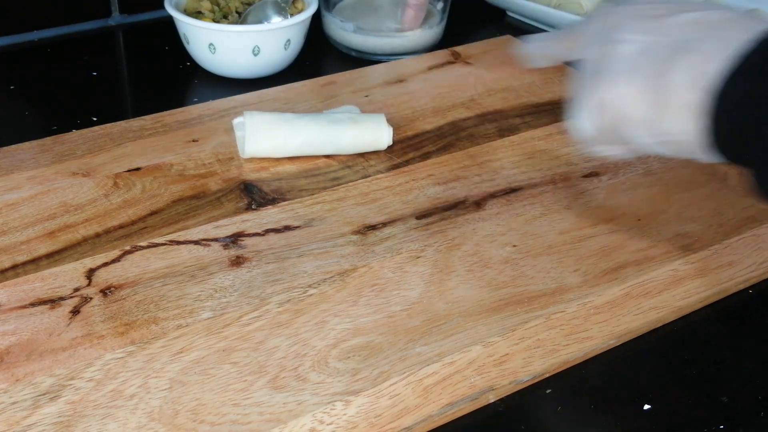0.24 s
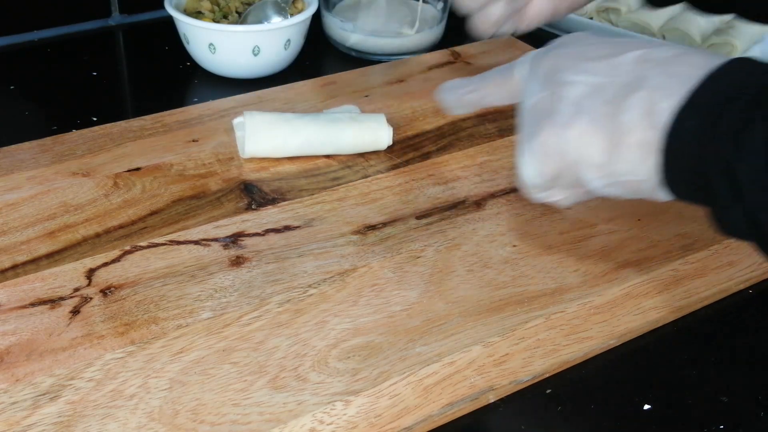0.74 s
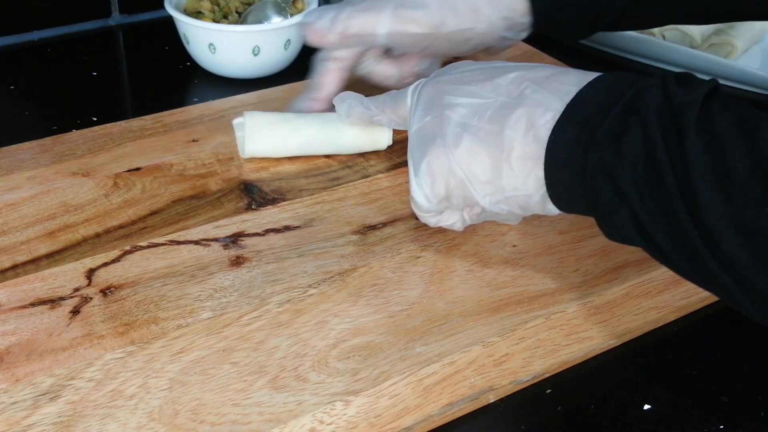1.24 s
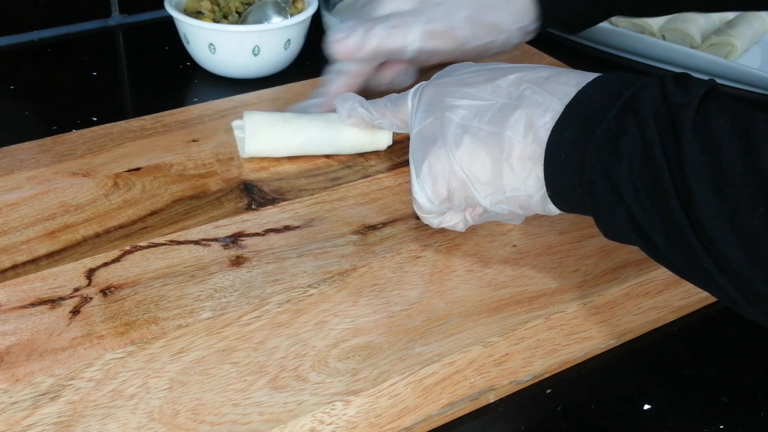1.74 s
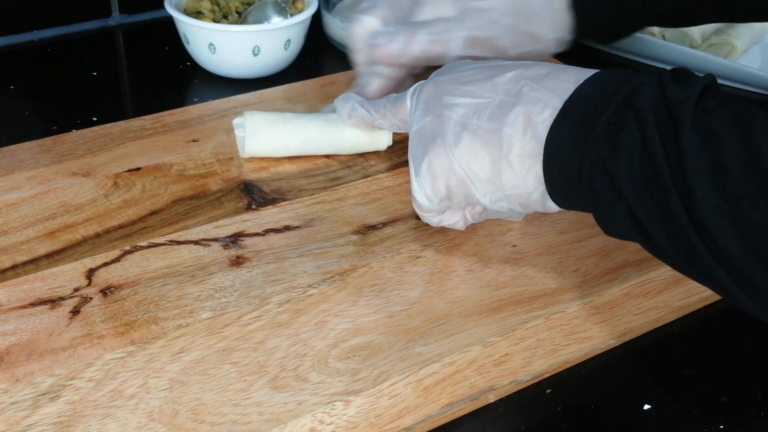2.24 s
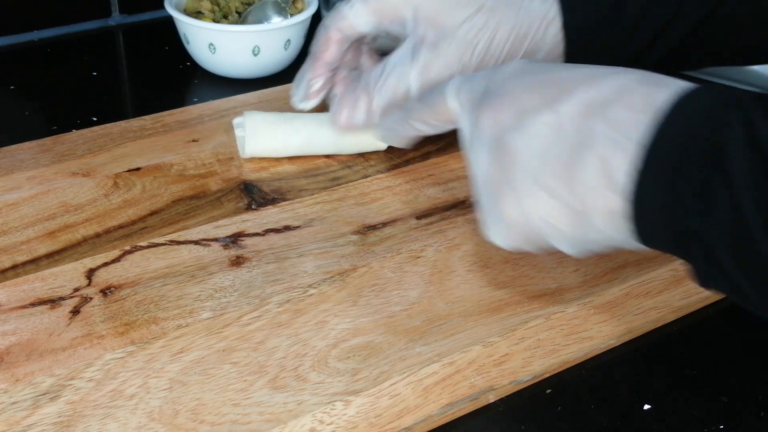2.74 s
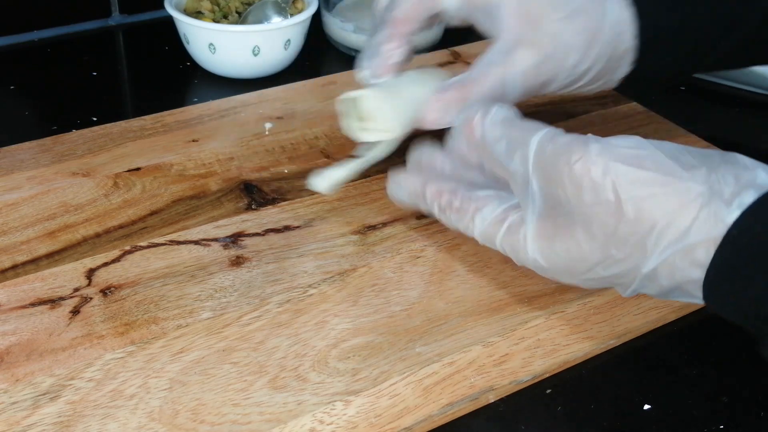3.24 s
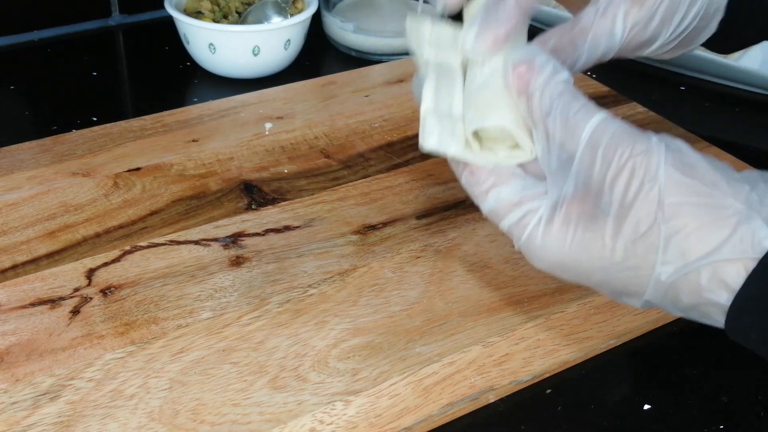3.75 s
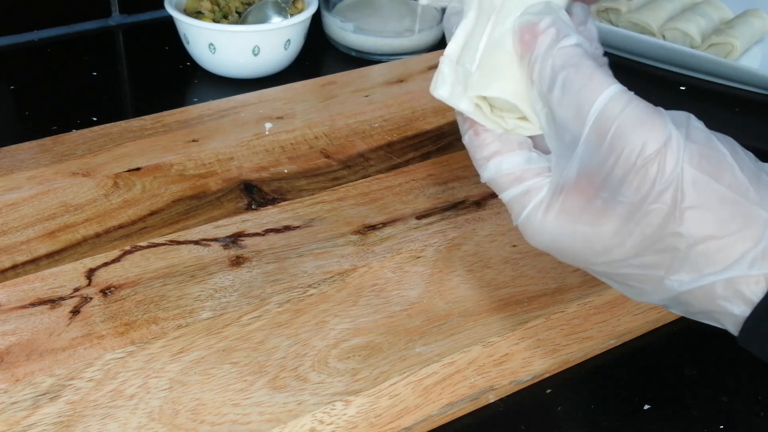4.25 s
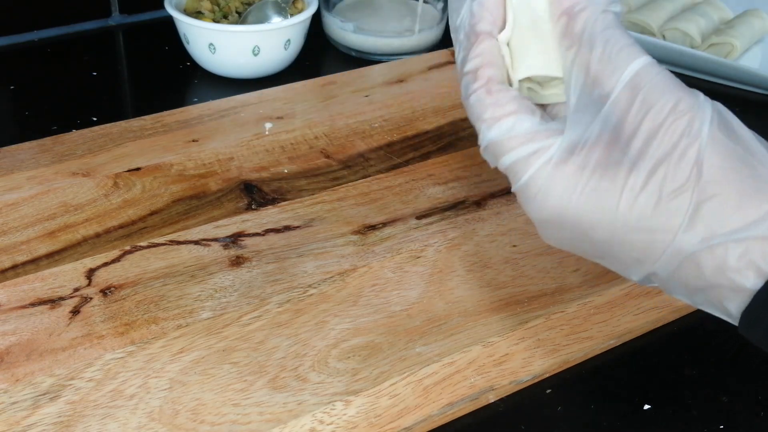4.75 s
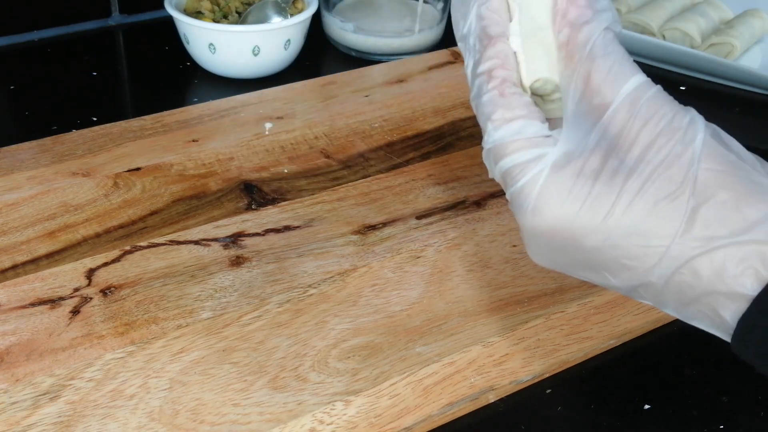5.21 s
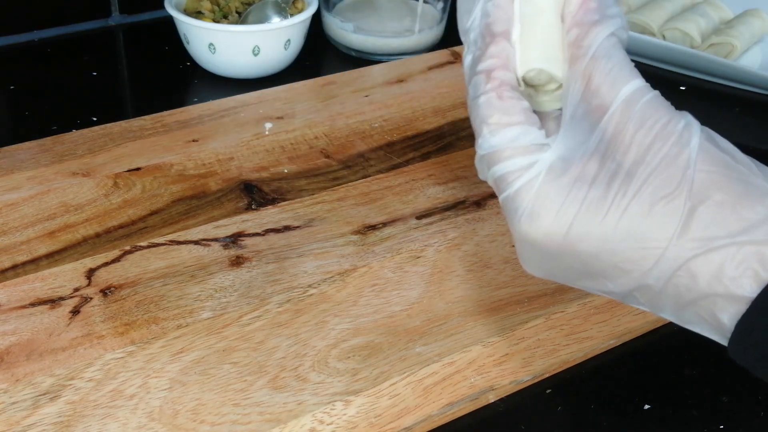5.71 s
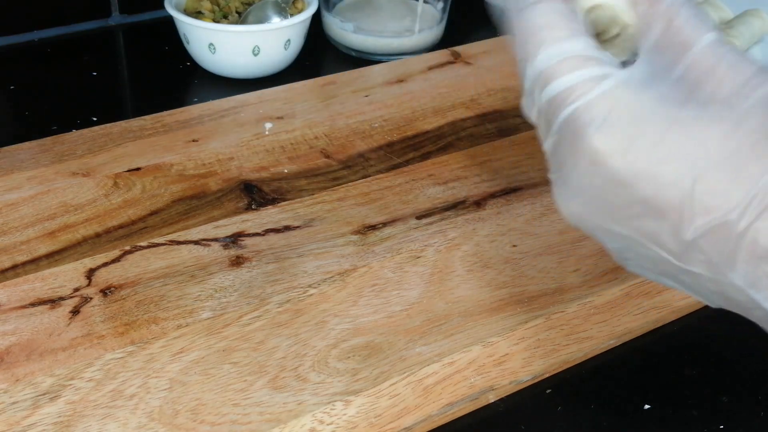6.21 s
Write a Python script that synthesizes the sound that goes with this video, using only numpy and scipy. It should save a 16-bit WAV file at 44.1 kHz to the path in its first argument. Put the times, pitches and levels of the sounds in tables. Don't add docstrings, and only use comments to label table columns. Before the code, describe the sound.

Close to the microphone in a small quiet kitchen, thin plastic gloves barely tick at first, then crackle in short dabs. Fuller, duller rustling follows as pastry is lifted and turned, then tight crinkling while it is wrapped. One firm knock on a wooden board lands around four seconds. A refrigerator hums low, a fan drones, and a distant bird whistles faintly.

```python
import sys
import numpy as np
from scipy import signal
from scipy.fft import rfft, irfft, next_fast_len
from scipy.io import wavfile
from scipy.ndimage import uniform_filter1d

SR = 44100
rng = np.random.default_rng(int(sys.argv[2]) if len(sys.argv) > 2 else 0)


def file_out(sig):
    cols = np.atleast_2d(sig).T
    lim = np.clip(cols, -1, 1)
    pcm = np.round(lim * 32767).astype(np.int16)
    wavfile.write(sys.argv[1], SR, pcm)


def natural_amplitude(level_db):
    exponent = np.asarray(level_db, float) / 20
    return 10 ** exponent


N = 285541
PADDED = next_fast_len(N)

# time of the peak in seconds, rise in seconds,
# fall in seconds, effort in dB, slack film relative to taut film in dB.
DABS = [(1.40, 0.072, 0.19, -76.5, 0), (1.545, 0.035, 0.065, -76, 1.5), (1.60, 0.12, 0.095, -65, -1),
        (1.70, 0.022, .035, -62, -7), (1.78, .1, 0.18, -75, -7), (1.969, 0.043, 0.069, -56, 1),
        (2.02, 0.05, 0.046, -68, 7), (2.199, 0.037, .04, -71.5, 2.5), (2.235, 0.021, .07, -70, 5.5),
        (2.34, 0.091, .1, -78, 2), (2.44, 0.1, 0.057, -73.5, -7.5), (2.515, 0.042, 0.087, -58.5, -1.5),
        (2.565, 0.071, .05, -61, -4.5), (2.67, 0.045, .06, -70, -9.5), (2.619, 0.023, 0.045, -59.5, -5),
        (2.725, .07, 0.073, -68.5, 4)]
# time of the peak in seconds, rise in seconds,
# fall in seconds, effort in dB, slack film relative to taut film in dB.
LIFTS = [(2.9, 0.027, 0.28, -65.5, -5.5), (3.03, 0.18, 0.16, -62.5, -11), (3.13, 0.11, 0.13, -63, -9.5),
         (3.3, .2, 0.46, -68, -9.5), (3.406, 0.0058, 0.063, -57.5, -12), (3.48, 0.08, 0.091, -58.5, -7),
         (3.54, 0.061, 0.11, -59.5, -6.5), (3.62, 0.052, 0.049, -68.5, -4.5), (3.775, 0.14, 0.08, -64, -8),
         (3.849, 0.085, 0.091, -65.5, -5), (3.97, 0.17, 0.38, -67.5, -12), (5.45, 0.045, 0.015, -66.5, -8),
         (4.57, 0.05, .05, -74, 2), (6.2, .06, 0.065, -75, 0)]
# time of the peak in seconds, rise in seconds,
# fall in seconds, effort in dB, slack film relative to taut film in dB.
WRAPS = [(4.061, .008, .07, -58, -10), (4.164, 0.084, 0.039, -61.5, -8), (4.215, 0.043, 0.065, -67.5, 0),
         (4.271, 0.05, 0.06, -63, -13), (4.35, .025, 0.035, -63, 0.5), (4.392, 0.049, 0.024, -51, -6.5),
         (4.5, 0.26, 0.24, -68, -2), (4.61, .025, 0.07, -60, -11.5), (4.7, .03, 0.077, -63.5, -10.5),
         (4.729, .006, .12, -62, -11.5), (4.86, 0.035, 0.11, -70.5, -9.5), (5.06, 0.18, 0.16, -74, -1.5),
         (5.158, 0.046, 0.034, -64, -4), (5.24, 0.21, .12, -69, -6), (5.311, 0.046, 0.026, -63.5, -2),
         (5.398, .09, 0.077, -57, -5.5), (5.553, 0.053, .05, -66.5, -4.5), (5.715, .12, .09, -69.5, -5),
         (5.895, 0.12, .1, -70, -6.5), (5.998, 0.071, 0.071, -70, -5.5), (6.145, 0.054, 0.12, -64, -6.5),
         (6.34, 0.083, 0.063, -57.5, -12.5), (6.4, 0.056, .05, -60, -11.5), (6.46, 0.029, .1, -59.5, -20)]
# time in seconds, peak in dB, ring pitch in Hz,
# slack part relative to the peak in dB.
CREASES = [(.168, -63, 4500, -4), (.358, -55, 6900, -29), (1.5363, -54, 5480, -7), (1.6876, -50, 4650, -20),
           (1.6907, -47.5, 4680, -11), (1.9368, -46, 5440, -12), (1.9477, -43, 6410, -1),
           (1.9688, -40, 4950, -16), (2.2237, -47.5, 5500, 8), (2.4908, -44, 5650, 3),
           (2.613, -45, 5240, -21), (3.0253, -42, 6670, -16), (3.2798, -46, 6700, -17.5),
           (3.404, -43, 5870, -31), (3.4085, -41, 6180, -25), (3.7737, -41, 6820, -19),
           (4.061, -50, 6940, -9), (4.1179, -37, 6300, -10), (4.339, -45, 6050, 3), (4.3443, -55, 5190, 5),
           (4.5997, -44, 5170, -1), (4.682, -45.5, 6830, -21), (4.7272, -40, 6900, -25),
           (5.3127, -51, 5200, -8), (5.3736, -46, 5970, 1), (5.392, -40.5, 5060, 2),
           (5.4632, -41.5, 6740, -17), (6.1428, -54, 6900, -7), (6.2895, -48, 5650, -1),
           (6.4538, -46, 6230, -28)]
# time in seconds, peak in dB, time to die by 60 dB in seconds.
KNOCKS = [
    (1.995, -58, 0.16),
    (4.117, -44.5, 0.2),
]
# pitch in Hz, width in Hz, level in dB.
HOLLOWS = [(2560, 90, -4.5), (3000, 130, -10.5), (5190, 50, 1), (6050, 22, -6), (7190, 200, -5)]
# time in seconds, pitch in Hz, level in dB.
BIRD_PHRASES = [
    [(.42, 4200, -104.5), (.455, 4140, -74), (.49, 4150, -93), (.54, 4150, -86), (.59, 4150, -93)],
    [(.56, 4640, -93), (.62, 4700, -94), (.68, 4750, -94), (.72, 4830, -97)],
    [(.83, 4360, -99), (.855, 4350, -91), (.88, 4400, -94)],
    [(.93, 4440, -90), (1.0, 4330, -86), (1.08, 4530, -92), (1.13, 4530, -87), (1.2, 4620, -84),
     (1.24, 4760, -96)],
    [(4.84, 3940, -99), (4.9, 3860, -81), (4.96, 3880, -81), (5.04, 4000, -99)],
]
# time of the peak in seconds, half length in seconds,
# level in dB.
BOOMS = [(.17, 0.097, -60.5), (.42, 0.25, -56), (.82, 0.13, -55), (1.08, .1, -57), (1.3, .08, -58),
         (1.82, .3, -55.5), (2.1, 0.098, -57), (2.68, 0.36, -57), (3.1, .15, -55.5), (3.32, .25, -59.5),
         (3.76, .14, -55), (4.12, 0.35, -54), (4.33, .12, -52), (4.67, 0.2, -52.5), (5.08, .25, -54.5),
         (5.47, .1, -55), (5.7, .14, -60.5), (6.13, 0.17, -53), (6.36, 0.19, -56.5)]
# time in seconds, level in dB.
BLADE_LEVEL = [(0.0, -62), (0.07, -66.5), (2.27, -71.5), (2.43, -65), (2.49, -81), (2.81, -63), (2.99, -85),
               (3.04, -70), (4.23, -66), (4.27, -74), (4.9, -60.5), (4.94, -69), (5.97, -69), (6.47, -79)]
# time in seconds, level in dB.
DRAUGHT = [(0, -74), (1.0, -69), (1.9, -75.5), (3.2, -75.5), (3.7, -67.5), (4.2, -73.5), (4.5, -79),
           (4.9, -74.5), (5.3, -80), (5.85, -76), (6.47, -82)]
# pitch in Hz, level in dB.
HUM = [(99.887, -44), (199.77, -79.5), (299.66, -78), (399.55, -84)]
# pitch in Hz, width in Hz, level in dB.
DRONE = [(488, 5, -79), (300, 12, -75), (217, 8, -75), (13, 6, -72), (383, 2, -82), (683, 3, -86)]
# frequency in Hz, level in dB per Hz.
AIR = [(5, -88.5), (30, -85), (60, -79.5), (85, -81.5), (150, -85), (180, -94), (260, -87), (370, -94.5),
       (540, -91.5), (620, -100), (1000, -103), (1500, -108), (2200, -112), (9000, -114)]
# frequency in Hz, gain in dB.
MIC = [(2000, 0), (2700, -0.5), (3450, 0.5), (3850, -7), (4300, -4), (4800, -0.5), (6300, -1.5), (6800, 3),
       (7200, 0.5), (7450, -8), (7700, -17.5), (7860, -32), (7950, -74)]


def gloves():
    t, coarse = np.arange(N) / SR, np.arange(0, N, 64) / SR
    moves = DABS + LIFTS + WRAPS
    power = np.array([effort(coarse, *move[:-1]) for move in moves])
    effort_db, slack_db = np.transpose(moves)[-2:]

    stretch_db = -7 + 0.3 * slack_db + 0.34 * (effort_db - effort_db.mean())
    dough_db = slack_db + np.repeat((-8, -3.5, -26), [len(DABS), len(LIFTS), len(WRAPS)])

    def strength(share):
        return np.interp(t, coarse, np.sqrt(share ** 2 @ power))

    slackness = np.interp(t, coarse, slack_db @ power / power.sum(0))
    taut_hz = 5460 - 60.5 * slackness
    layers = strength(np.ones(len(power))) * film(4750, 7600, cycles=13, per_s=3600, spread_db=1.7,
                                                  centre_hz=taut_hz)
    layers += strength(natural_amplitude(slack_db)) * film(1750, 3680, cycles=13, per_s=2600, spread_db=2.7,
                                             centre_hz=2930, octaves=0.18)
    layers += strength(natural_amplitude(stretch_db)) * film(3530, 4500, cycles=12, per_s=1800, spread_db=3)
    layers += strength(natural_amplitude(dough_db)) * film(630, 1900, cycles=1, per_s=1500, spread_db=2.2)

    clump_db, clump_s = 0.5, 0.0097
    clumps = evened(uniform_filter1d(rng.standard_normal(N), round(clump_s * SR)))
    return natural_amplitude(clump_db * clumps) * layers


def effort(t, s, rise, fall, db):
    late = np.where(t < s, (s - t) / max(rise, .003), (t - s) / max(fall, .003))
    return natural_amplitude(db - 16.5 * late ** 1.34) ** 2 + 1e-14


def film(low_hz, high_hz, cycles, per_s, spread_db, centre_hz=None, octaves=0.11, count=16):
    chance, size, sign = rng.random(N), rng.exponential(1, N), rng.choice([-1., 1.], N)
    which = rng.integers(0, count, N)
    pitches = np.geomspace(low_hz, high_hz, count) * rng.uniform(1.0, 1.02, count)

    shift_db, shift_s = 1.5, 0.056
    drift = rng.standard_normal((N // 256 + 1, count))
    load = evened(uniform_filter1d(drift, round(shift_s * SR / 256), axis=0))
    snap_db = spread_db * np.minimum(size, 4) + shift_db * load[np.arange(N) // 256, which]
    snaps = sign * natural_amplitude(snap_db) * (chance < per_s / SR)

    if centre_hz is not None:
        distance = np.log2(pitches[which] / centre_hz) / octaves
        snaps = snaps * (0.8 + np.exp(-.5 * distance ** 2))
    out = np.zeros(N)
    for k, hz in enumerate(pitches):
        out += signal.oaconvolve(snaps * (which == k), evened(ring(hz, cycles)))[:N]
    return evened(out)


def ring(hz, cycles, size=400):
    turns = np.arange(size) / SR * hz
    return np.sin(2 * np.pi * turns) * np.exp(-3 * turns / cycles) * (1 - np.exp(-2 * turns))


def creases():
    out, t = np.zeros(N), np.arange(6000) / SR
    shape = (len(CREASES), len(t))
    spray = rng.standard_normal(shape) * (rng.random(shape) < .08)
    spray_t60 = 0.083
    for (s, db, hz, slack_db), grains in zip(CREASES, spray):
        drive = 0.24 * grains * natural_amplitude(-60 * t / spray_t60)
        drive[0] = 1
        body = ring(hz, 18.0) + 0.94 * ring(5100, 2.8) + natural_amplitude(slack_db) * ring(2500, 6.7)
        add(out, s, natural_amplitude(db - 8) * signal.oaconvolve(drive, body))
    return out


def knocks():
    out, t = np.zeros(N), np.arange(8000) / SR
    board = signal.butter(2, [280, 1050], "band", fs=SR)
    for s, db, t60 in KNOCKS:
        noise = rng.standard_normal(len(t))
        puff = evened(signal.lfilter(*board, noise)) * natural_amplitude(db - 11.5 - 60 * t / t60)
        crack = noise * natural_amplitude(db - 2.5 - 60 * t / 0.096)
        push = np.sin(2 * np.pi * 170 * t) * natural_amplitude(db - 4.5 - 60 * t / 0.037)
        add(out, s, puff + crack + push)
    return out


def hollows(x):
    def gain_at(f):
        return 1 + sum(natural_amplitude(db) / (1 + 2j * (f - hz) / width) for hz, width, db in HOLLOWS)
    return shaped(x, gain_at)


def kitchen(x):
    t = np.arange(SR // 3) / SR
    room_t60 = 0.054
    sparse = (rng.random(len(t)) < .06) * (t > .002)
    taps = rng.choice([-1., 1.], len(t)) * sparse * natural_amplitude(-60 * t / room_t60)
    return signal.oaconvolve(x, taps / np.linalg.norm(taps))[:N]


def fan():
    t, coarse = np.arange(N) / SR, np.arange(0, N, 64) / SR
    boom_power = sum(effort(coarse, s, half, half, db) for s, half, db in BOOMS)
    boom = np.interp(t, coarse, np.sqrt(boom_power))
    shaft = wavering_tone(44, 1.5)
    blade = wavering_tone(244, 1.5)
    shake, flap, gust = (hump(0, width, rng.standard_normal(N)) for width in (20., 10., 4.))
    blade_db = np.interp(t, *np.transpose(BLADE_LEVEL)) + 1.9 * flap
    rush_db = np.interp(t, *np.transpose(DRAUGHT)) + 1.5 * gust
    rush = natural_amplitude(rush_db) * hump(560, 560, rng.standard_normal(N))
    return boom * natural_amplitude(2 * shake) * shaft + natural_amplitude(blade_db) * blade + rush


def wavering_tone(hz, width):
    pitch = hz + width * hump(0, 5., rng.standard_normal(N))
    return np.sqrt(2) * np.sin(2 * np.pi * np.cumsum(pitch) / SR)


def appliances():
    t = np.arange(N) / SR
    hum = sum(natural_amplitude(db) * np.sqrt(2) * np.sin(2 * np.pi * (f * t + rng.random())) for f, db in HUM)
    noise = rng.standard_normal(N)
    return hum + sum(natural_amplitude(db) * hump(f, width, noise) for f, width, db in DRONE)


def bird():
    out = np.zeros(N)
    for rows in BIRD_PHRASES:
        s, hz, db = np.transpose(rows)
        t = np.arange(s[0], s[-1], 1 / SR)
        flutter, waver = (evened(uniform_filter1d(rng.standard_normal(len(t)), 300)) for _ in range(2))
        pitch = np.interp(t, s, hz) * (1 + .008 * waver)
        pips = .85 + .5 * flutter
        level = natural_amplitude(np.interp(t, s, db) + 9.0)
        add(out, s[0], pips * level * np.sin(2 * np.pi * np.cumsum(pitch) / SR))
    return out


def air():
    frames = N // 512 + 5
    a, b, patches = rng.standard_normal((frames, 1025, 3)).T
    patches = uniform_filter1d(patches, 20, axis=0)
    patches = evened(uniform_filter1d(patches, 8, axis=1))
    white = signal.istft((a + 1j * b) * natural_amplitude(1.3 * patches), nperseg=2048, noverlap=1536)[1][:N]
    return shaped(evened(white), lambda f: natural_amplitude(read(AIR, f)) * np.sqrt(SR / 2))


def evened(x):
    return x / np.sqrt(np.mean(x ** 2) + 1e-20)


def read(points, hz):
    f, value = np.transpose(points)
    return np.interp(np.log(hz + 1), np.log(f + 1), value)


def add(mix, s, sound):
    part = mix[round(s * SR):][:len(sound)]
    part += sound[:len(part)]


def shaped(x, gain_at):
    return irfft(rfft(x, PADDED) * gain_at(np.fft.rfftfreq(PADDED, 1 / SR)), PADDED)[..., :N]


def hump(hz, width, x):
    return evened(shaped(x, lambda f: 1 / (1 + (2 * (f - hz) / width) ** 2)))


def scene():
    near = hollows(gloves() + creases() + knocks())
    echo = natural_amplitude(-11.5) * kitchen(near)
    return (near + echo + fan() + appliances() + bird() + air())[None]


def roll_off(x):
    return signal.sosfilt(signal.butter(12, 8090, fs=SR, output="sos"), x)


def record(dry):
    coloured = shaped(dry, lambda f: natural_amplitude(read(MIC, f)))
    mix = coloured - .00038
    return roll_off(mix)


dry = scene()
out = record(dry)
file_out(out)
```